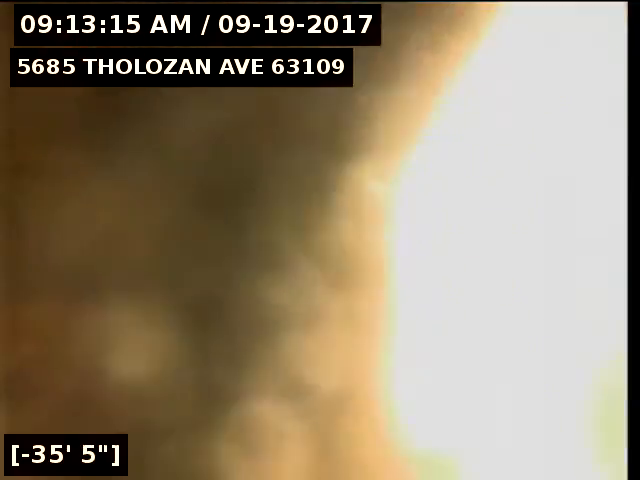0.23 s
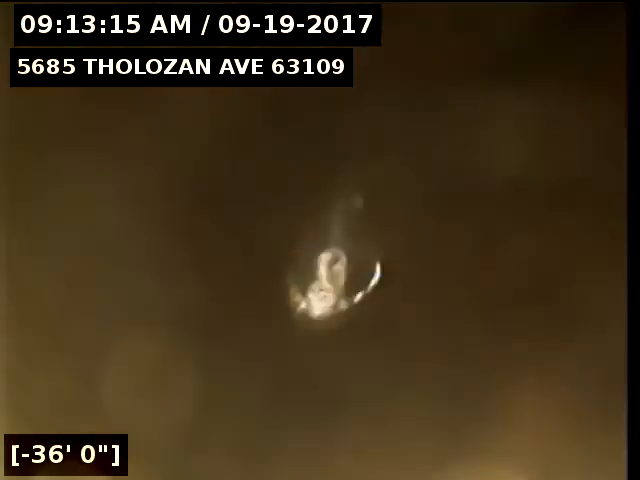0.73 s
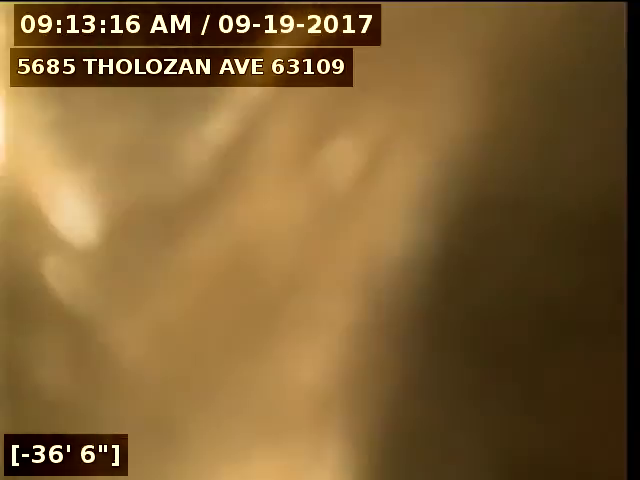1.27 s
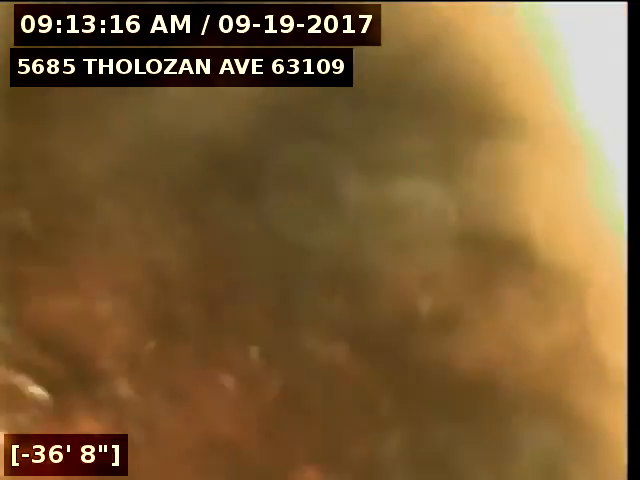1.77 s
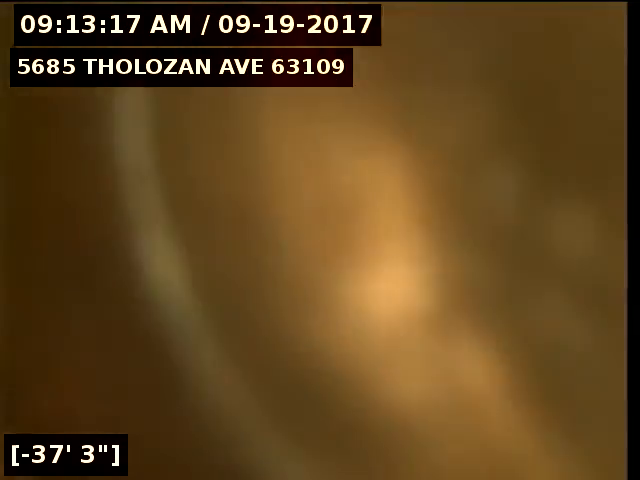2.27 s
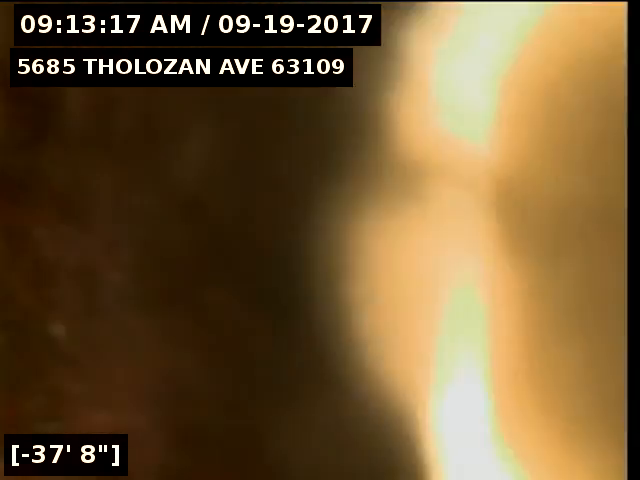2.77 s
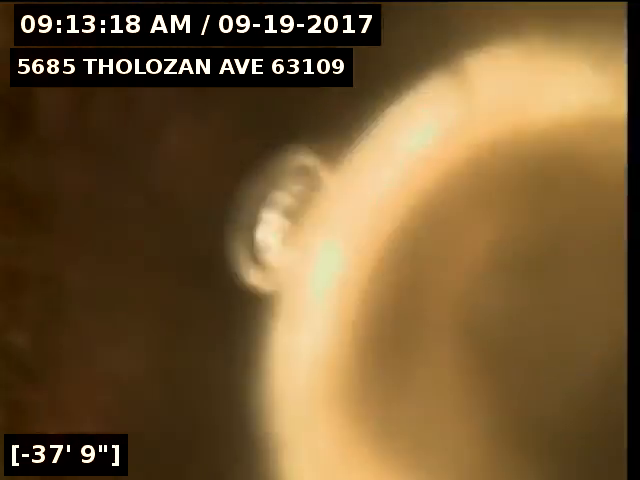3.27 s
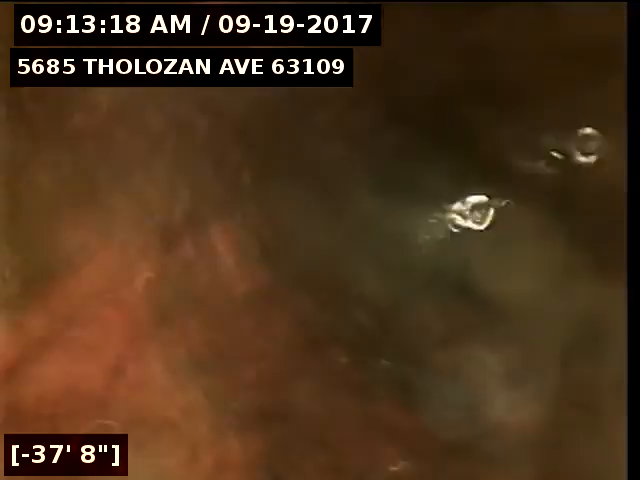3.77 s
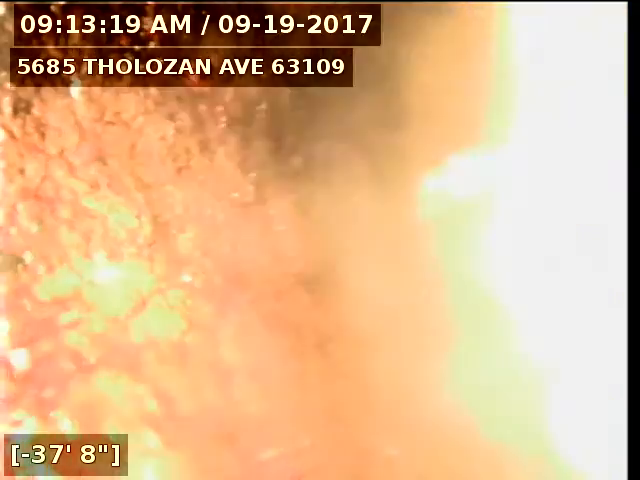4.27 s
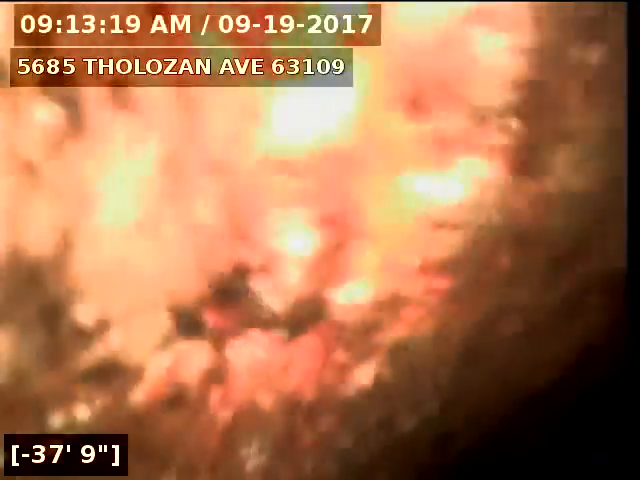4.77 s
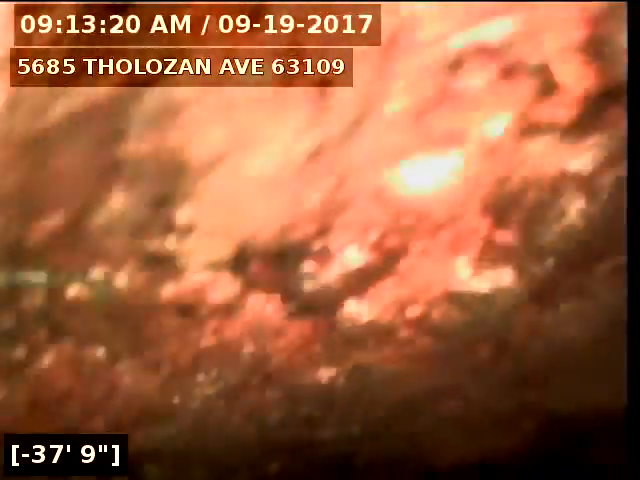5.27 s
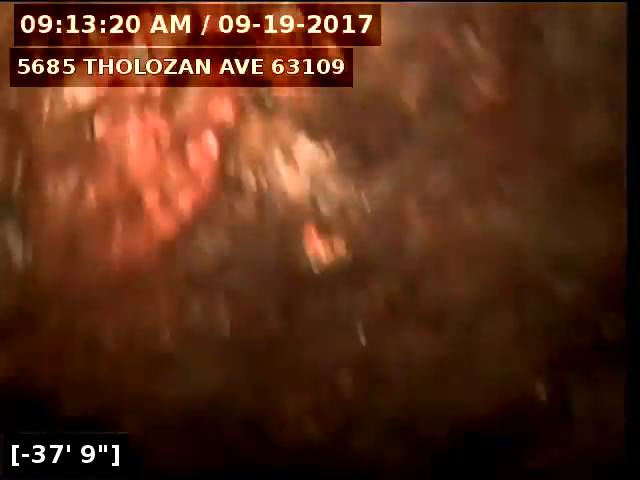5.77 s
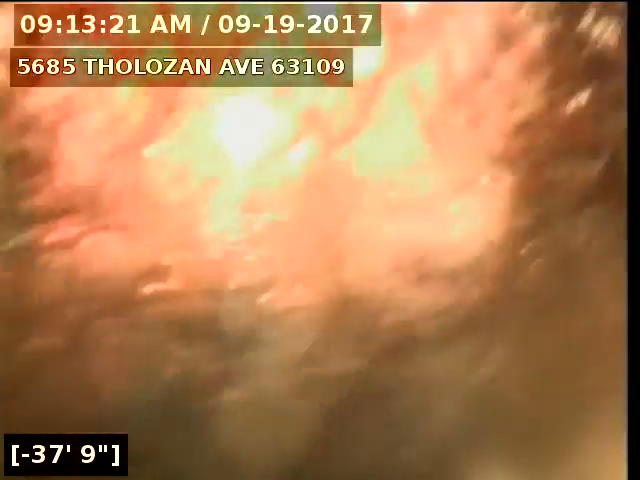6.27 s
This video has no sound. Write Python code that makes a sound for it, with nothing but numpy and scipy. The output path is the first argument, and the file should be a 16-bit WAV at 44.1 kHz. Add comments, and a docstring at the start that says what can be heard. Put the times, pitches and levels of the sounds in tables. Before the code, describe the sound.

Close to a cable reel, in a reverberant room: two soft hollow thumps, rattling knocks, scrapes and a short wavering metal squeal. A few more bumps, a lull of hissy air, then a hard bright clank. Light ticking clinks come in quick succession, interrupted once by complete silence, then thin out to faint brushes. The microphone sounds narrow and slightly muffled, with constant hiss.

```python
"""Camera cable hauled up a metal pipe

An inspection camera is hauled up a waste pipe by its push cable, heard from the reel in a hard-walled room.
The cable knocks, scrapes, clinks and squeals on rim and reel: shaped noise and uneven tones. Harder means brighter.
Soft hollow bumps are short dying tones. Filtered noise makes the echo, the room air and the microphone hiss.
The treble has a notch and a top limit, and the sound drops out once."""
import sys
import numpy as np
from scipy import signal
from scipy.fft import rfft, irfft, next_fast_len
from scipy.io import wavfile

SR = 44100
rng = np.random.default_rng(int(sys.argv[2]) if len(sys.argv) > 2 else 0)


def store_pcm(level_fs):
    """Save levels as 16-bit WAV."""
    pcm = np.round(np.clip(level_fs, -1, 1) * 32767).astype(np.int16)
    wavfile.write(sys.argv[1], SR, np.atleast_2d(pcm).T)


N = 287091
T = np.arange(N) / SR  # time of each sample [s]
TOP_HZ = 9000  # nothing is heard above this

# the cable slaps pipe or reel:
# (time [s], strength [dB], hardness [dB], rattle: time to fall 60 dB [s], ring pitch [Hz])
KNOCK_EVENTS = [(.575, -33, -0.5, .2, 310), (0.649, -32, -16, 0.23, 540), (0.726, -38.5, -1, 0.55, 400),
                (.953, -20, 2.5, 0.41, 204), (0.961, -20, -2, 0.29, 666), (1.361, -31, 4.5, 0.16, 410),
                (1.522, -39, -7.5, 1, 115), (2.015, -43, -11, 0.17, 200), (2.212, -43, -4, 0.45, 280),
                (3.63, -25, 9, 0.045, 1440), (3.738, -29.5, -4.5, 0.24, 340),
                (3.829, -40.5, 7.5, 0.08, 411.4), (4.553, -41, -2, 0.75, 500), (4.589, -47, 10, 0.42, 200),
                (4.711, -40.5, 9, 0.25, 1330), (4.965, -35.5, -1.5, 0.2, 262),
                (4.985, -41.5, -14, .33, 145), (5.439, -37.5, -7, 0.11, 415), (6.092, -37.5, -15, .06, 385)]

# how quickly a light touch of metal starts
CLINK_ATTACK_S = 0.00043


def amp(db):
    """Turn decibels into a gain."""
    return 10 ** (np.asarray(db) / 20)


def unit(x):
    """Scale to an average (rms) size of 1."""
    return x / np.sqrt(np.mean(x ** 2) + 1e-20)


def shape(points, hz):
    """Join (frequency [Hz], level [dB]) points into a gain curve, on a log frequency axis."""
    f, db = np.transpose(points)
    return amp(np.interp(np.log(hz + 1), np.log(f), db))


def peaks(modes, hz):
    """Gain of resonances standing on a flat response."""
    power = 1
    for f, width, db in modes:
        power = power + amp(db) ** 2 * 2 / (1 + (2 * (hz - f) / width) ** 2)
    return np.sqrt(power)


def coloured(x, gain):
    """Filter with the given gain curve, never sounding early; white noise keeps its power."""
    size = 2 * next_fast_len(N // 2 + SR // 2)
    g = unit(gain(np.fft.rfftfreq(size, 1 / SR)))
    # folding the cepstrum (spectrum of the log gain) forward in time makes the filter minimum phase
    cepstrum = irfft(np.log(np.maximum(g, 1e-6)))
    cepstrum[1:size // 2] *= 2
    cepstrum[size // 2 + 1:] = 0
    response = np.exp(rfft(cepstrum))
    return irfft(rfft(x, size) * response)[:N]


def wobble(rate):
    """A smooth random curve with about `rate` random points a second."""
    knots = rng.standard_normal(int(N * rate / SR) + 4)
    fine = signal.resample_poly(knots, 8, 1)
    return np.interp(T * rate * 8, np.arange(len(fine)), fine)


def struck(s, rise, t60):
    """Envelope that swells from time s and dies away; t60 is the time to fall 60 dB [s]."""
    envelope = np.zeros(N)
    live = slice(int(max(s, 0) * SR), int((s + 2 * t60) * SR))
    age = np.maximum(T[live] - s, 0)
    envelope[live] = (1 - np.exp(-age / rise)) * np.exp(-np.log(1000) * age / t60)
    return envelope


def chatter(envelopes, grain_db):
    """Force of many tiny uneven impacts, as noise under the summed power of the envelopes."""
    noise = rng.standard_normal(N)
    grains = amp(grain_db * wobble(700))
    total = np.sqrt(sum(e ** 2 for e in envelopes))
    return total * unit(noise * grains)


def forces(envelopes, levels, grain_db):
    """One chattering force for each colour; levels holds, per colour, the dB of every contact."""
    return [chatter((e * g for e, g in zip(envelopes, amp(db))), grain_db) for db in levels]


def steel_tone(hz):
    """An uneven, broken tone whose size and phase flutter, faster at higher pitch."""
    flutter = 22 + .075 * hz  # random points a second
    steady_share, flutter_share = 0.48, 0.82
    uneven = steady_share + flutter_share * (wobble(flutter) + 1j * wobble(flutter))
    return np.imag(uneven * np.exp(2j * np.pi * hz * T))


def background():
    """Hollow, restless room air under gently drifting microphone hiss; the low air wanders most."""
    # colour of the room air: (frequency [Hz], relative level [dB per Hz])
    air_colour = [(25, -13.5), (80, -13), (150, -5.5), (280, -5), (400, 1), (465, -7), (540, 0.5),
                  (760, -2), (950, 0.5), (1400, 0.5), (1850, -2.5), (2300, -1), (3000, -6.5), (3650, -16),
                  (4200, -33)]
    # colour of the hiss: (frequency [Hz], relative level [dB per Hz])
    hiss_colour = [(2500, -33.5), (4100, -15.5), (4900, -1), (5800, 2.5), (7000, 2.5), (7500, -1.5),
                   (8000, -10.5), (8500, -17), (8950, -37.5)]
    # resonances that colour both: (frequency [Hz], width [Hz], strength [dB])
    hollows = [(506, 23, 10), (568, 130, 2), (884, 32, 4), (1000, 24, -12.5), (1316, 18, 2),
               (1404, 11, 6.5), (1614, 40, 1), (1706, 22, -1), (2157, 6.6, 8.5), (3020, 20, -13.5),
               (5870, 90, -0.5), (6800, 26, -2.5)]
    air = coloured(rng.standard_normal(N), lambda hz: shape(air_colour, hz) * peaks(hollows, hz))
    hiss = coloured(rng.standard_normal(N), lambda hz: shape(hiss_colour, hz) * peaks(hollows, hz))
    drift = amp(.45 * wobble(5))
    low_pass = signal.butter(2, 700, fs=SR, output="sos")
    low_air = signal.sosfiltfilt(low_pass, air)
    wander = amp(1.4 * wobble(11))
    restless_air = drift * (air + (wander - 1) * low_air)
    return amp(-42.5) * restless_air + amp(-51.0) * np.sqrt(drift) * hiss


def bumps():
    """A soft blow briefly rings one damped hollow tone and rebounds once."""
    # hollow bumps: (time [s], strength [dB], pitch [Hz])
    bump_events = [(.024, -12.5, 550), (.043, -9.5, 559), (2.013, -19.5, 596), (2.443, -22, 566),
                   (2.522, -9.5, 578), (2.571, -22, 448), (2.623, -26.5, 590), (2.677, -19.5, 510)]
    attack_s, t60_s = 0.0023, 0.032
    rebound_s, rebound_db = .014, -13.5  # delay and level of the second blow

    def blow(s, hz):
        """One dying sine wave."""
        return struck(s, attack_s, t60_s) * np.sin(2 * np.pi * hz * (T - s))

    total = np.zeros(N)
    for s, db, hz in bump_events:
        total += amp(db) * (blow(s, hz) + amp(rebound_db) * blow(s + rebound_s, hz))
    return total


def scrapes():
    """Each pull is a rounded swell of small slips; the cable catches and lets go on the rim."""
    # the cable slides over the rim: (time of the height [s], swell [s], strength [dB], hardness [dB])
    scrape_events = [(.04, 0.046, -33, -6.5), (.3, 0.023, -46.5, 3), (.395, 0.0087, -38.5, 0.5),
                     (0.701, 0.077, -40, -6), (.945, .015, -35.5, -1.5), (1.27, 0.26, -39, -1.5),
                     (1.506, 0.026, -37.5, 9), (1.611, 0.011, -39, 5), (2.39, 0.024, -40, -0.5),
                     (3.592, 0.018, -33, 8), (3.618, 0.014, -33.5, 8), (3.647, 0.023, -28, 1.5),
                     (4.405, .04, -37, 1.5), (4.752, 0.04, -41, 2.5), (5.49, 0.035, -41, 2)]
    # feed to thud, body, clank and edge: (level at hardness 0 [dB], change [dB per dB of hardness])
    scrape_mix = [(-11.5, -0.77), (-2, -0.22), (-8, 1.51), (-14.5, 1.1)]
    fade_over_swell = 0.95  # length of the fade, as a share of the swell
    times, swells, db, hardness = np.transpose(scrape_events)
    catching = amp(0.2 * wobble(rate=70))
    pulls = []
    for s, swell in zip(times, swells):
        away = np.maximum(s - T, (T - s) / fade_over_swell) / swell  # distance from the height
        pulls.append(catching / np.cosh(np.minimum(away, 20)))
    levels = [db + base_db + slope * hardness for base_db, slope in scrape_mix]
    return forces(pulls, levels, grain_db=-0.5)


def strays():
    """The cable brushes the pipe faintly at random moments."""
    count, level_db, spread_db, t60_s = 36, -49.5, 3, .07
    draws = rng.uniform([0, -1], [N / SR, 1], (count, 2))  # time [s], size from -1 to 1
    touches = (amp(level_db + spread_db * size) * struck(when, CLINK_ATTACK_S, t60_s)
               for when, size in draws)
    return chatter(touches, grain_db=7)


def clinks():
    """Hard, light touches with a short buzz; brightness trades clank for tick around the edge."""
    # light metal contacts: (time [s], strength [dB], brightness [dB], buzz: time to fall 60 dB [s])
    clink_events = [(0.573, -43.5, -4.5, 0.042), (1.006, -45, 1, 1), (1.023, -40.5, 5, 0.044),
                    (1.464, -41.5, -17.5, 0.044), (1.521, -38.5, -2.5, 0.34), (1.593, -39, -3, 0.21),
                    (1.747, -46, -15, 0.084), (4.315, -45.5, -6.5, .055), (4.366, -40, 1, 0.13),
                    (4.405, -38, -1, 0.056), (4.438, -43.5, 0, 0.05), (4.604, -42, 1, 0.18),
                    (4.714, -34, 4.5, 0.052), (4.821, -38, -2, 0.15), (4.933, -36.5, 4, 0.074),
                    (5.054, -46.5, 2, .06), (5.298, -48, 2.5, 0.085), (5.487, -47, -1, 0.077),
                    (6.316, -51, 10, 0.059)]
    snap_t60_s, snap_share = 0.085, 0.31  # an extra snap at the start
    edge_db = 2
    times, db, brightness, buzz = np.transpose(clink_events)
    taps = [struck(s, CLINK_ATTACK_S, t60) + snap_share * struck(s, .0002, snap_t60_s)
            for s, t60 in zip(times, buzz)]
    return forces(taps, [db - brightness, db + edge_db, db + brightness], grain_db=1.3)


def knocks():
    """The cable slaps pipe and reel, then rattles out: thud, body and clank."""
    attack_s = 0.0019
    slap_t60_s, slap_share = 0.043, .55  # the first slap stands out of the rattle
    clank_db = -4.5  # at hardness 0
    # thud at a typical rattle length, and its growth each time that length doubles
    thud_base_db, typical_rattle_s, growth_db = -8.5, .25, 3
    times, db, hardness, rattle, _ = np.transpose(KNOCK_EVENTS)
    blows = [struck(s, attack_s, t60) + slap_share * struck(s, .0003, slap_t60_s)
             for s, t60 in zip(times, rattle)]
    thud_db = db + thud_base_db + growth_db * np.log2(rattle / typical_rattle_s)
    return forces(blows, [thud_db, db, db + clank_db + hardness], grain_db=3.6)


def knock_rings():
    """Each knock leaves one resonance ringing for a set number of cycles, so low ones last longer."""
    level_db, swell_s = -1.5, .005
    cycles, longest_s = 70, 0.3  # even the lowest falls 60 dB within this time
    total = np.zeros(N)
    for s, db, _, _, hz in KNOCK_EVENTS:
        t60 = min(cycles / hz, longest_s)
        total += amp(db + level_db) * struck(s, swell_s, t60) * steel_tone(hz)
    return total


def squeals():
    """Steel sings: a rub or knock quickly swells a resonance, which then dies."""
    # singing tones: (time [s], pitch [Hz], level [dB], time to fall 60 dB [s])
    squeal_events = [(1.08, 2216, -32, 0.47), (1.045, 430.8, -25.5, 0.71), (1.465, 1866, -29, 0.75),
                     (1.483, 1138, -19.5, 0.17), (1.49, 2920, -31, 0.21), (3.19, 940, -38, 0.67),
                     (3.595, 1345, -23, 0.21), (3.745, 323.7, -25, 0.27)]
    swell_s = .02
    return sum(amp(db) * struck(s, swell_s, t60) * steel_tone(hz) for s, hz, db, t60 in squeal_events)


def room(x, t60_low, t60_high):
    """Dense reflections, redrawn every quarter second; the treble dies first."""
    wet = np.zeros(N + 2 * SR)
    step = SR // 4  # a fresh random echo every quarter second
    for start in range(0, N, step):
        hz, t, z = signal.stft(rng.standard_normal(SR // 2), SR, nperseg=256)
        t60 = np.interp(hz, [0, TOP_HZ], [t60_low, t60_high])[:, None]
        fading = z * np.exp(-np.log(1000) * t / t60)
        tail = signal.istft(fading, SR, nperseg=256)[1]
        tail[:SR // 200] = 0  # no echo in the first 5 ms
        answer = signal.fftconvolve(x[start:start + step], tail / np.linalg.norm(tail))
        wet[start:start + len(answer)] += answer
    return wet[:N]


def scene():
    """Most contacts drive shared resonances of pipe, reel and room; all contacts raise echo."""
    # resonances of pipe, reel and room: (frequency [Hz], width [Hz], strength [dB])
    modes = [(109, 20, -6.5), (135, 20, -13.5), (198, 14, 5.5), (253, 6.7, 9.5), (320.7, 9.7, 7),
             (426, 39, 7), (490, 17, -4.5), (566, 33, 5.5), (625, 49, 4), (720, 24, -24), (890, 7.3, -2),
             (963, 9.7, 4), (1150, 15, -2.5), (1045, 11, 4.5), (1300, 120, -1), (1328, 17, -0.5),
             (1534, 25, 0.5), (1570, 22, 0), (1898, 6.7, 9.5), (2110, 120, -3.5), (2884, 110, 0.5),
             (3100, 30, 1.5)]
    # colours of a contact, each: (frequency [Hz], relative level [dB per Hz])
    thud_colour = [(25, -20), (50, -26.5), (80, -22), (110, -10.5), (160, -3.5), (205, -1.5), (280, 4),
                   (380, -5), (900, -46)]
    body_colour = [(100, -41), (220, -22.5), (310, -9.5), (420, -1.5), (650, -4.5), (900, -5), (1500, -34),
                   (4000, -62)]
    clank_colour = [(200, -25), (550, -13), (900, 0), (1350, 1), (1900, -4), (2400, -12.5), (3300, -20.5),
                    (4500, -31.5), (7000, -28.5), (9000, -54.5)]
    edge_colour = [(1200, -7.5), (2200, -3.5), (2600, -2.5), (3100, -5), (3700, -9.5), (4500, -24.5),
                   (7000, -10), (9000, -37)]
    tick_colour = [(3000, -25), (4500, -19), (5600, -8), (6600, -1), (7300, -9), (8000, -30), (9000, -31)]

    def ringing(force, colour):
        """A force coloured by its contact and by the resonances."""
        return coloured(force, lambda hz: shape(colour, hz) * peaks(modes, hz))

    near = bumps()  # close by, so they raise slightly less echo
    scrape_thud, scrape_body, scrape_clank, scrape_edge = scrapes()
    clink_clank, clink_edge, clink_tick = clinks()
    knock_thud, knock_body, knock_clank = knocks()
    thud = ringing(knock_thud + scrape_thud, thud_colour)
    body = ringing(knock_body + scrape_body, body_colour)
    clank = ringing(knock_clank + scrape_clank + clink_clank + strays(), clank_colour)
    edge = ringing(clink_edge + scrape_edge, edge_colour)
    tick = coloured(clink_tick, lambda hz: shape(tick_colour, hz))
    contacts = thud + body + clank + edge + tick + knock_rings() + squeals()
    echo = amp(-7.5) * room(contacts + amp(-2) * near, t60_low=0.49, t60_high=0.28)
    return (contacts + near + echo + background())[None]


def record(dry):
    """A narrow notch with soft shoulders, a brief dropout and the top limit."""
    # the dropout: (start [s], end [s])
    gap = (4.443, 4.555)
    notch_hz = 4000
    size = next_fast_len(N + SR // 2)
    hz = np.fft.rfftfreq(size, 1 / SR)
    away = np.abs(hz - notch_hz)
    shoulders = amp(-11 * np.exp(-away / 130))
    notch = shoulders * (1 - np.exp(-(away / 50) ** 4))
    band = np.clip((TOP_HZ - hz) / 300, 0, 1)
    live = (T < gap[0]) | (T > gap[1])
    gated = irfft(rfft(dry, size) * notch, size)[:, :N] * live
    return irfft(rfft(gated, size) * band, size)[:, :N]


dry = scene()
out = record(dry)
store_pcm(out)
```